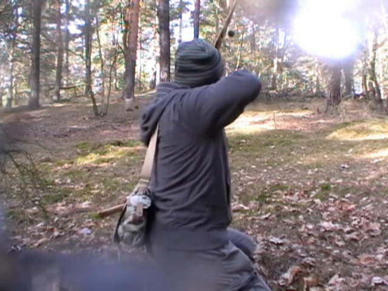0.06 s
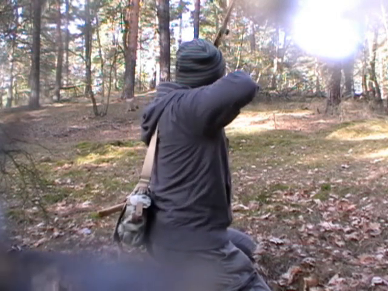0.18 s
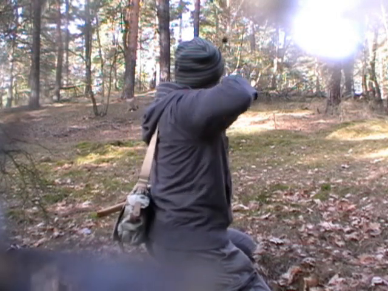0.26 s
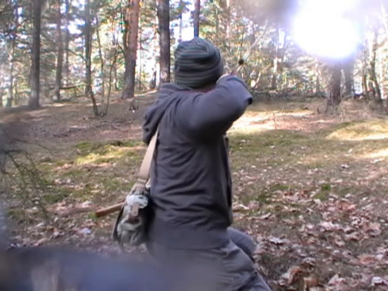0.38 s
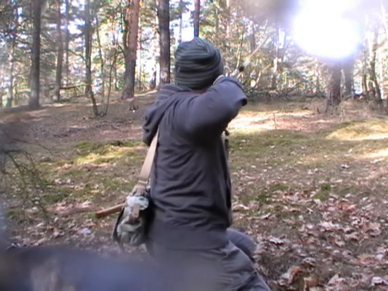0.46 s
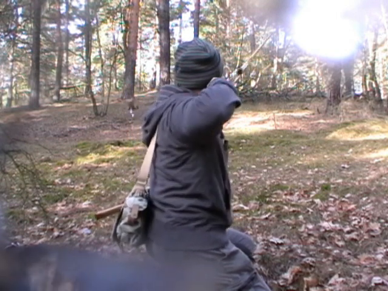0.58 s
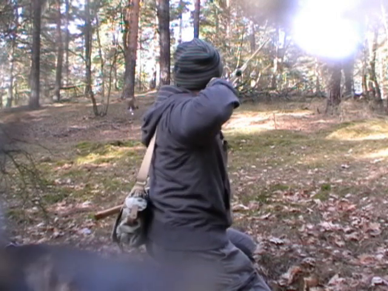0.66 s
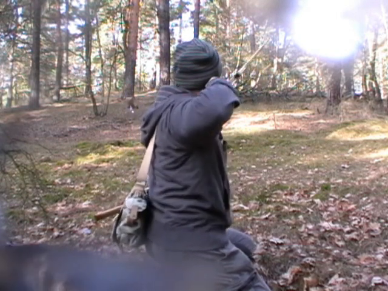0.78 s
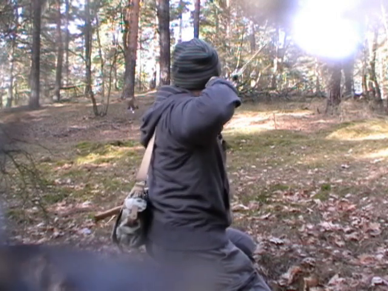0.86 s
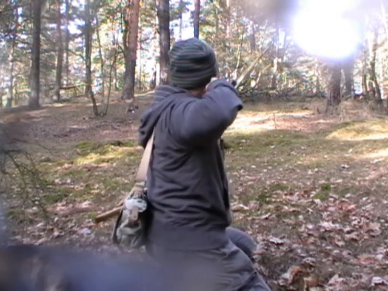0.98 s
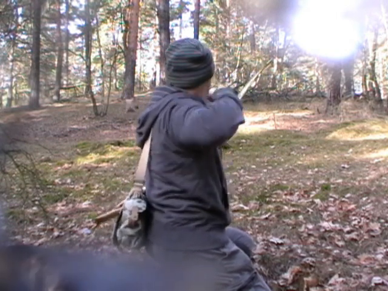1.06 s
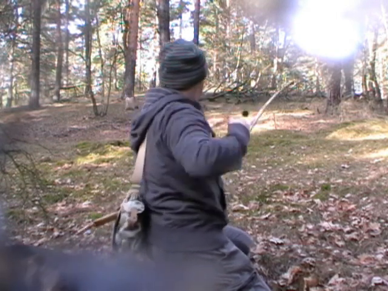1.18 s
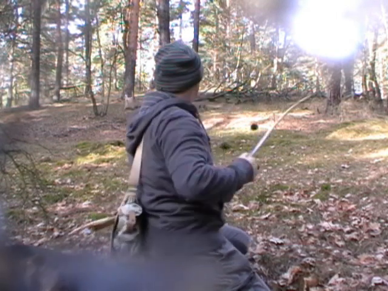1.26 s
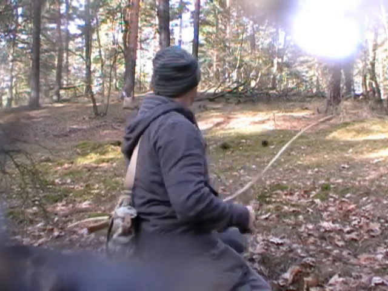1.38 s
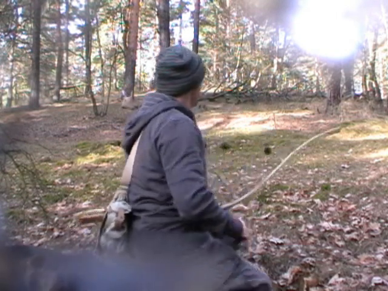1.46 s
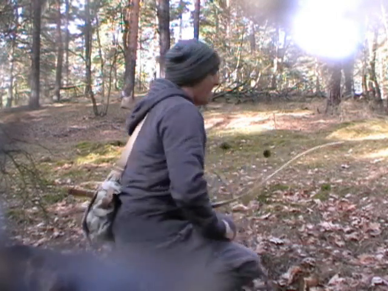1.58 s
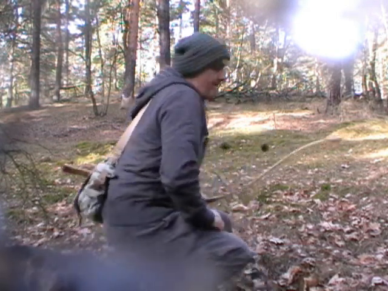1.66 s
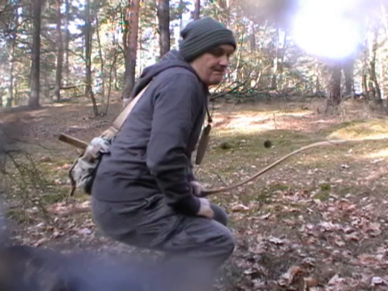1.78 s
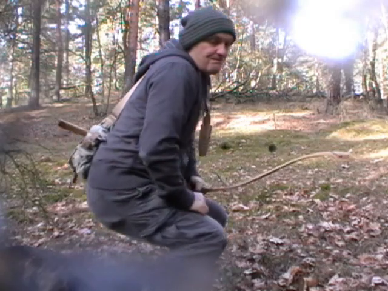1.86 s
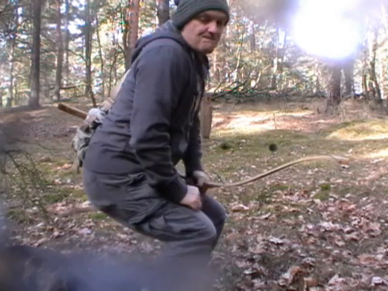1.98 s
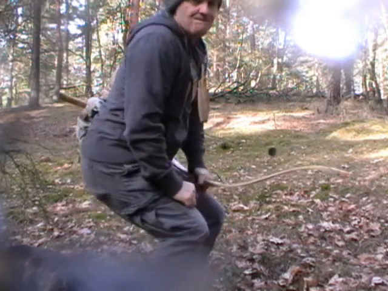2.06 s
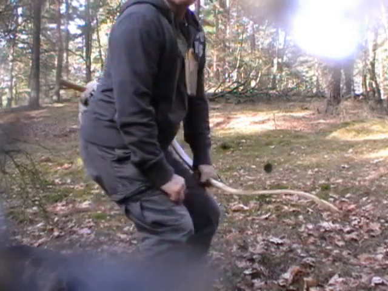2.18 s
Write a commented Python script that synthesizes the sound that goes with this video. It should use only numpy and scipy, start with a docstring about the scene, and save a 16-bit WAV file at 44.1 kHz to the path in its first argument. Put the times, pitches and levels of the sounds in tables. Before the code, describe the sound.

A longbow shot in a quiet forest, heard close in stereo. Faint airy hush and tiny clicks first; at 0.25 s a loud dry wooden clack with string slap and short ring. A fluttering hiss peaks near 0.46 s; at 0.59 s the arrow cracks into its target with a woody knock. Diffuse echoes fade; from 1.4 to 2.2 s leaves rustle, cloth scuffs, gear clicks.

```python
"""A faint rush of forest air comes first, with a soft rustle of leaves and small clicks: all shaped noise.
Then a longbow is shot: the arrow clacks past, the string slaps home (short bursts) and the wood rings (sines).
The arrow hisses away as fluttering noise and cracks into its target; the trunks echo both as fading noise.
At last the archer rises from dry leaves, with grainy rustling, scuffing clothes and clicks of gear."""
import sys
import numpy as np
from scipy import signal
from scipy.fft import rfft, irfft, next_fast_len
from scipy.io import wavfile
from scipy.ndimage import map_coordinates

SR = 44100
rng = np.random.default_rng(int(sys.argv[2]) if len(sys.argv) > 2 else 0)


def generate_wav(sig):
    """Save sig (samples, or channels by samples) to the path in sys.argv[1] as 16-bit PCM at SR."""
    pcm = np.round(np.clip(np.atleast_2d(sig).T, -1, 1) * 32767).astype(np.int16)
    wavfile.write(sys.argv[1], SR, pcm)


N = 97020

# All levels are those before the housing colours the sound. A t60 is the time to fade by 60 dB;
# for the chatter of a contact it sets the fade without being its exact length.

# forest air over time: start_s [s], level_db [dB]
AIR_LEVEL = [(0, -63.5), (.7, -63), (1.3, -62), (2.2, -61)]
# relative spectrum of the forest air: pitch_hz [Hz], level_db [dB per Hz]
AIR_SPECTRUM = [(25, -24), (70, -34), (130, -11.5), (200, -3), (290, -3), (430, 6), (700, -1), (1500, 1.5),
                (2500, -9), (4500, -10), (9000, -20), (16000, -23)]
# leaf rustle over time: start_s [s], level_db [dB]
RUSTLE_LEVEL = [(0, -72.5), (.3, -74), (.9, -72.5), (1.31, -68), (1.39, -59.5), (1.48, -60.5), (1.55, -55),
                (1.62, -58.5), (1.75, -54), (1.82, -61), (1.98, -59), (2.1, -62.5), (2.2, -57.5)]
# relative spectrum of dry leaves: pitch_hz [Hz], level_db [dB per Hz]
LEAF_SPECTRUM = [(40, -24), (150, -24), (500, -14.5), (1000, -0.5), (1700, 3), (3200, -1), (5500, -1.5),
                 (9000, -7), (12800, -2.5), (14200, -8), (16000, -4.5)]
# rubs of sleeve and trousers: middle_s [s], half_length_s [s], level_db [dB]
SCUFFS = [(1.552, 0.09, -60), (1.745, 0.12, -66)]
# relative spectrum of cloth: pitch_hz [Hz], level_db [dB per Hz]
CLOTH_SPECTRUM = [(40, -31), (200, -25), (500, -8), (900, 7.5), (1700, 3.5), (3300, 6), (5000, -11),
                  (14000, -33)]
# clicks of gear and twigs: start_s [s], knock_db [dB], snap_db [dB], t60_s [s],
# pitch_hz [Hz], pitch_db [dB]
CLICKS = [(0.027, -69, -60, 0.013, 12600, -56), (.183, -50.5, -61, 0.01, 5640, -55.5),
          (0.461, -47, -45, 0.03, 3400, -59), (0.729, -65, -50, 0.042, 12000, -55),
          (.973, -51.5, -56, 0.023, 1160, -48.5), (1.001, -68, -59, 0.0074, 9000, -58),
          (1.216, -55, -59, 0.026, 2190, -58.5), (1.29, -68, -61, 0.014, 9500, -59.5),
          (1.537, -60, -50, 0.008, 2490, -53), (1.558, -59, -53, 0.0055, 9100, -42.5),
          (1.63, -52, -67, 0.0074, 11500, -47), (1.714, -54, -62, 0.036, 3200, -58),
          (1.744, -51, -57, 0.022, 4600, -52), (1.757, -49, -51, 0.022, 1950, -41),
          (1.846, -48, -50, 0.028, 2200, -58), (1.8939, -47, -41, 0.004, 9800, -44),
          (1.901, -51.5, -54, 0.017, 6030, -48.5), (1.981, -66, -57, 0.045, 6700, -55.5),
          (2.165, -59, -55, 0.024, 2000, -59), (2.169, -45, -40, 0.009, 5500, -46)]
# relative spectrum of a woody knock: pitch_hz [Hz], level_db [dB per Hz]
KNOCK_SPECTRUM = [(40, -43), (150, -57.5), (380, -3), (700, -14), (1100, -0.5), (1700, 6.5), (2400, 0),
                  (3500, -5.5), (5000, -14), (16000, -49.5)]
# relative spectrum of a crisp snap: pitch_hz [Hz], level_db [dB per Hz]
SNAP_SPECTRUM = [(100, -23), (1000, 4.5), (3000, -12.5), (5000, 5.5), (7500, 7), (10000, 1), (13000, 3),
                 (16000, -5)]
# relative spectrum of a dull thud: pitch_hz [Hz], level_db [dB per Hz]
THUD_SPECTRUM = [(40, -38), (100, -34), (170, -14), (260, -11), (420, -2), (700, -8), (1500, -33),
                 (8000, -93)]
# contacts in the target: start_s [s], thud_db [dB], knock_db [dB], snap_db [dB], t60_s [s]
STRIKE = [(0.581, -48, -27.5, -31, 0.074), (0.5856, -38, -25.5, -24, 0.016),
          (0.5901, -31.5, -16, -47, 0.01), (0.5951, -50, -30, -46, 0.04), (0.606, -41, -36, -54, 0.046),
          (0.6217, -40.5, -47, -49, 0.022), (0.632, -44.5, -47, -55, 0.017), (.647, -62, -41, -48, 0.065)]
# low ringing tones of the target: pitch_hz [Hz], level_db [dB], t60_s [s]
TARGET_BODY = [(280, -11, 0.019), (355, -3, .03), (455, -5, 0.039)]
# the blow as the shaft stops dead: start_s [s], level_db [dB]
SHAFT_STOP = (.5903, -18.5)
# ringing tones of the target's woody core: pitch_hz [Hz], level_db [dB], t60_s [s]
CORE_TONES = [(1780, 0, .023), (2850, -11, 0.034)]
# hiss of the flying arrow over time: start_s [s], level_db [dB]
FLIGHT_LEVEL = [(.25, -71), (.275, -58), (.33, -56), (.41, -52.5), (.465, -40.5), (.51, -51), (.577, -61.5),
                (.62, -87)]
# relative spectrum of the feathers: pitch_hz [Hz], level_db [dB per Hz]
FEATHER_SPECTRUM = [(200, -39), (900, -10), (1700, 10.5), (3000, 8.5), (4500, 5.5), (9000, 2.5),
                    (13000, 6.5), (15000, 3)]
# contacts of the shot: start_s [s], knock_db [dB], snap_db [dB], t60_s [s]
RELEASE = [(0.206, -53, -76, 0.37), (0.2420, -31, -56, 0.023), (.2437, -20, -59, 0.019),
           (0.2453, -20.5, -39, 0.032), (.254, -33, -59, 0.044), (0.2591, -8.5, -37, 0.0032),
           (0.2603, -20.5, -24, 0.011), (.2640, -18.5, -32.5, 0.019), (.269, -29.5, -45, 0.071),
           (.282, -29, -59, 0.014)]
# blows that set the bow and shaft ringing: start_s [s], level_db [dB]
BOW_BLOWS = [(0.2451, -25.5), (.2642, -11.5)]
# ringing tones of the wood: pitch_hz [Hz], level_db [dB], t60_s [s]
WOOD_TONES = [(880, -21, 0.035), (1044, -21, 0.034), (1207, -30, 0.05), (1610, -14, 0.034),
              (1741, -0.5, 0.043), (2100, -16, 0.031), (2860, -23, 0.03), (3650, -20, 0.037)]
# what the bow sends out into the forest: start_s [s], level_db [dB]
BOW_ECHO = (.259, -7)
# what the target sends out into the forest: start_s [s], level_db [dB]
TARGET_ECHO = (.587, -11)
# fading of the forest echo: pitch_hz [Hz], t60_s [s]
FOREST_T60 = [(150, 1.2), (500, 1.26), (1600, 1.9), (3000, 1.19), (6000, 1), (14000, 0.69)]
# fading of the echo from ground and trunks round the target: pitch_hz [Hz], t60_s [s]
NEAR_T60 = [(200, 0.13), (2000, 0.32), (7000, 0.32), (14000, 0.39)]
# relative spectra of the three echoes: pitch_hz [Hz], level_db [dB per Hz]
BOW_ECHO_SPECTRUM = [(100, -26.5), (400, -14.0), (800, -8.5), (1150, 2.5), (1700, 3), (2400, -0.5),
                     (3400, -3), (4500, -9), (8000, -16), (14000, -12)]
TARGET_ECHO_SPECTRUM = [(100, -33), (380, -1), (700, -8.5), (1150, -3.5), (1700, 0.5), (2400, -3.0),
                        (3400, -4.5), (4500, -15.0), (8000, -16.5), (14000, -28)]
NEAR_ECHO_SPECTRUM = [(200, 3), (900, -9.0), (1700, 0), (2600, 2), (7000, 4.5), (14000, -0.5)]
# how alike left and right are: pitch_hz [Hz], likeness [0 unrelated to 1 the same]
ALIKE = [(50, 0.61), (130, 1), (700, 0.9), (1300, 1), (2800, 0.86), (5000, 0.55), (9000, 0.58),
         (14000, 0.4)]
# bumps and dips from the hollows of the camera housing: pitch_hz [Hz], width_hz [Hz], level_db [dB]
HOUSING = [(484, 53, 1), (587, 50, -3), (880, 56, 5), (1057, 44, -3.5), (1100, 28, 1), (1358, 74, -8),
           (1740, 42, 2), (1970, 110, -7), (2280, 150, 2), (2550, 59, -16.5), (2830, 65, 3),
           (3345, 193, -8.5), (3431, 195, 8), (4150, 364, -4)]


def amp(db):
    """Turn decibels into a gain."""
    return 10 ** (np.asarray(db) / 20)


def unit(x):
    """Scale x to an average strength (rms) of 1."""
    return x / np.sqrt(np.mean(x ** 2) + 1e-20)


def along(points, hz):
    """Read a curve of (Hz, value) points, evenly in musical pitch."""
    f, v = np.transpose(points)
    return np.interp(np.log(hz + 1), np.log(f + 1), v)


def level(rows):
    """Draw a gain for every sample through (s, dB) rows."""
    return amp(np.interp(np.arange(N) / SR, *np.transpose(rows)))


def wobble(rate):
    """A smooth random curve with rate random points a second."""
    points = rng.standard_normal(int(N * rate / SR) + 4)
    return map_coordinates(points, [np.arange(N) * rate / SR])


def coloured(x, gain_db):
    """Filter x by a curve in dB over Hz, at unit power and without sounding ahead of time."""
    m = 2 * next_fast_len(N)
    gain = unit(amp(gain_db(np.fft.rfftfreq(m, 1 / SR))))
    # folding the cepstrum forward puts the filter's response after each input sample
    cepstrum = irfft(np.log(gain + 1e-6), m)
    cepstrum[1:m // 2] *= 2
    cepstrum[m // 2 + 1:] = 0
    response = np.exp(rfft(cepstrum))
    return irfft(rfft(x, m) * response, m)[..., :N]


def stereo(pair, spectrum):
    """Mix two unrelated signals into left and right, as alike at each pitch as ALIKE says."""
    m = 2 * next_fast_len(N)
    likeness = np.clip(along(ALIKE, np.fft.rfftfreq(m, 1 / SR)), 0, 1)
    turn = np.arccos(likeness) / 2
    mid, side = irfft(rfft(pair, m) * [np.cos(turn), np.sin(turn)], m)[:, :N]
    return coloured(np.array([mid + side, mid - side]), lambda hz: along(spectrum, hz))


def blows(rows, spectrum, push):
    """Each (s, dB, t60) contact is one clean push and a dying chatter, then coloured."""
    out, t = np.zeros((2, N + SR)), np.arange(SR // 8) / SR
    for start_s, db, t60 in rows:
        fade = amp(-60 * t / t60)
        z = rfft(rng.standard_normal((2, len(t))) * fade)
        even = irfft(z / (abs(z) + 1e-9), len(t))  # every pitch equally strong
        chatter = even * np.sqrt(fade)
        chatter /= np.linalg.norm(chatter, axis=1, keepdims=True)
        chatter[0, 0] += push
        strength = amp(db) * np.linalg.norm(fade) / np.hypot(1, push)
        out[:, round(start_s * SR):][:, :len(t)] += strength * chatter
    return stereo(out[:, :N], spectrum)


def ringing(rows, modes):
    """Each (s, dB) blow starts every (Hz, dB, t60) tone anew as a fading sine."""
    t, ring = np.arange(N) / SR, 0
    for start_s, db in rows:
        age = np.maximum(t - start_s, 0)
        for hz, mode_db, t60 in modes:
            ring = ring + amp(db + mode_db - 60 * age / t60) * np.sin(2 * np.pi * hz * age)
    return ring


def echo(x, t60s, colour, rise_s):
    """Scattered sound builds up, then each pitch dies at its own speed."""
    hz, t, z = signal.stft(rng.standard_normal((2, N)), SR, nperseg=256)
    fade = amp(-60 * t / along(t60s, hz)[:, None])
    build_up = 1 - np.exp(-t / rise_s)
    tail = signal.istft(z * fade * build_up, SR, nperseg=256)[1][:, :N]
    tail = stereo(tail / np.linalg.norm(tail[0]), colour)
    return signal.fftconvolve(x.mean(axis=0)[None], tail, axes=1)[:, :N]


def forest_air():
    """A faint, even rush among the trees: noise that sways very slightly in level."""
    sway_db = 0.17
    sway = amp(sway_db * wobble(8.3))
    return level(AIR_LEVEL) * sway * stereo(rng.standard_normal((2, N)), AIR_SPECTRUM)


def forest(start_s, db, colour):
    """The trunks return a sharp sound as one diffuse wash."""
    pulse = np.zeros((1, N))
    pulse[0, round(start_s * SR)] = amp(db)
    return echo(pulse, FOREST_T60, colour, rise_s=0.004)


def crackles(count):
    """Dry leaf edges snap in a dense run of tiny ticks, each with its own size and pitch."""
    low_hz, high_hz = 4500, 13500
    life_cycles, spread_db = 1.3, 16  # cycles to fade to about a third; loudest to softest tick
    out, t = np.zeros((2, N + SR)), np.arange(SR // 200) / SR
    for when, pitch, size, side in rng.random((count, 4)):
        hz = low_hz + pitch * (high_hz - low_hz)
        fade = np.exp(-hz * t / life_cycles)
        tick = amp(-spread_db * size) * np.sin(2 * np.pi * hz * t) * fade
        # the second row becomes the difference between left and right
        out[:, int(when * N):][:, :len(t)] += np.outer([1, 2 * (2 * side - 1)], tick)
    return unit(out[:, :N])


def handling():
    """Dry leaves rustle in tiny grains and crisp crackles; cloth scuffs as the archer rises."""
    t = np.arange(N) / SR
    grain_db, clump_db, catch_db = 2.5, 0.8, 2
    grain_level = amp(grain_db * wobble(900) + clump_db * wobble(50.2))
    grains = unit(rng.standard_normal((2, N)) * grain_level)
    leaves = unit(grains + .55 * crackles(count=900))
    rustle = level(RUSTLE_LEVEL) * stereo(leaves, LEAF_SPECTRUM)
    rubbing = unit(rng.standard_normal((2, N)) * amp(catch_db * wobble(220)))
    swell = sum(amp(db) * np.exp(-((t - middle_s) / half_s) ** 2) for middle_s, half_s, db in SCUFFS)
    return rustle + swell * stereo(rubbing, CLOTH_SPECTRUM)


def clicks():
    """Gear and twigs click, each with a brief rough pitch made of narrow-band noise."""
    rows, age = np.array(CLICKS), np.arange(SR // 8) / SR
    knocks = blows(rows[:, [0, 1, 3]], KNOCK_SPECTRUM, push=0.062)
    snaps = blows(rows[:, [0, 2, 3]], SNAP_SPECTRUM, push=0.15)
    out = knocks + snaps
    width_share, ring_longer = .22, 1.5  # bandwidth as a share of pitch; times the row's t60
    for start_s, _, _, t60, hz, db in CLICKS:
        peak = signal.iirpeak(min(hz, 15000), 1 / width_share, fs=SR)
        band = signal.lfilter(*peak, rng.standard_normal(len(age)))
        pitched = unit(band) * amp(db - 60 * age / (t60 * ring_longer))
        start = round(start_s * SR)
        out[:, start:start + len(age)] += pitched[:N - start]
    return out


def target():
    """The point cracks in, the target thuds and shudders, its woody core rings, the forest answers."""
    rows = np.array(STRIKE)
    bass_hz, near_db = 230, -7.5  # too small a body to radiate deep bass
    no_bass = signal.butter(4, bass_hz, 'high', fs=SR, output='sos')
    body = signal.sosfilt(no_bass, ringing(rows[:, [0, 1]], TARGET_BODY))
    thud = blows(rows[:, [0, 1, 4]], THUD_SPECTRUM, push=0.28) + body
    knocks = blows(rows[:, [0, 2, 4]], KNOCK_SPECTRUM, push=0.6)
    snaps = blows(rows[:, [0, 3, 4]], SNAP_SPECTRUM, push=0.22)
    crack = knocks + snaps + ringing([SHAFT_STOP], CORE_TONES)
    near = echo(crack, NEAR_T60, NEAR_ECHO_SPECTRUM, rise_s=0.024)
    far = forest(*TARGET_ECHO, TARGET_ECHO_SPECTRUM)
    return thud + crack + amp(near_db) * near + far


def flight():
    """The feathers hiss and flutter as the arrow flies: noise with a fast uneven level."""
    flutter_db = 2.5
    flutter = amp(flutter_db * wobble(88.3))
    return level(FLIGHT_LEVEL) * flutter * stereo(rng.standard_normal((2, N)), FEATHER_SPECTRUM)


def bow():
    """The arrow clacks along the bow, the string slaps home, the wood rings, the forest answers."""
    rows = np.array(RELEASE)
    knocks = blows(rows[:, [0, 1, 3]], KNOCK_SPECTRUM, push=0.7)
    snaps = blows(rows[:, [0, 2, 3]], SNAP_SPECTRUM, push=0.35)
    ring = ringing(BOW_BLOWS, WOOD_TONES)
    bass_hz = 260  # so thin a stave radiates little bass
    no_bass = signal.butter(2, bass_hz, 'high', fs=SR, output='sos')
    direct = signal.sosfilt(no_bass, knocks + snaps + ring)
    width = 0.74  # the bow is close and straight ahead
    middle = direct.mean(axis=0)
    direct = middle + width * (direct - middle)
    return direct + forest(*BOW_ECHO, BOW_ECHO_SPECTRUM)


def scene():
    """Add up all sources, a little to the left."""
    left_db = 0.18  # left up and right down by this much
    mix = forest_air() + handling() + clicks() + target() + flight() + bow()
    return mix * amp([[left_db], [-left_db]])


def record(dry):
    """The camera housing colours the sound; nothing passes above the band limit."""
    top_hz = 15950

    def housing_db(hz):
        """Add up the bell-shaped bumps and dips of the hollows."""
        return sum(db * np.exp(-((hz - centre) / width) ** 2) for centre, width, db in HOUSING)

    x = coloured(dry, housing_db)
    m = 2 * next_fast_len(N)
    passes = np.fft.rfftfreq(m, 1 / SR) < top_hz
    return irfft(rfft(x, m) * passes, m)[:, :N]


dry = scene()
out = record(dry)
generate_wav(out)
```